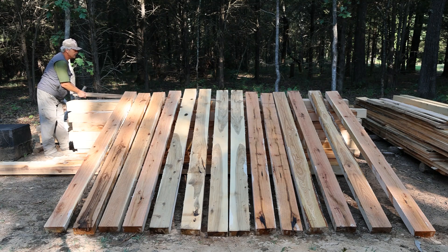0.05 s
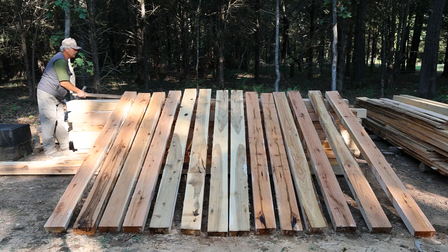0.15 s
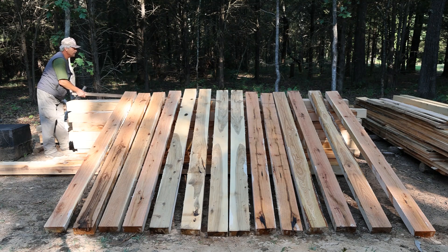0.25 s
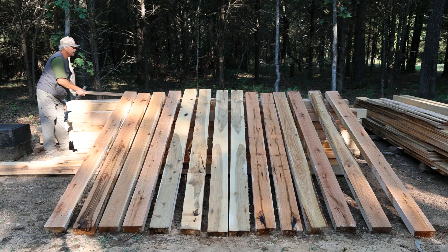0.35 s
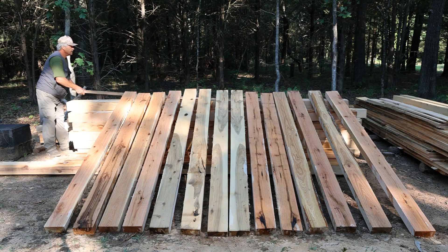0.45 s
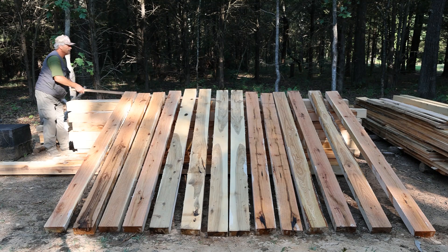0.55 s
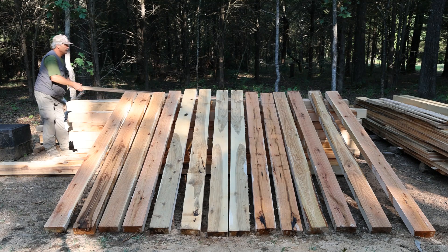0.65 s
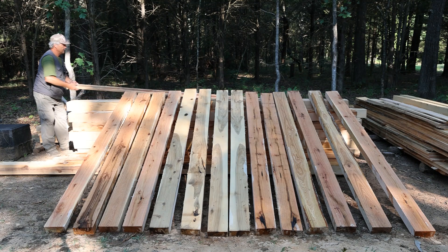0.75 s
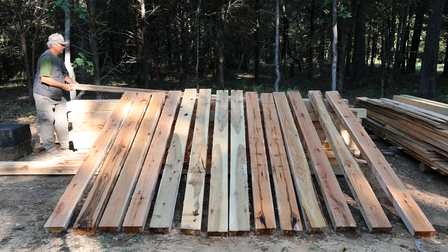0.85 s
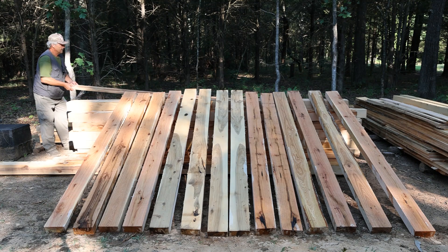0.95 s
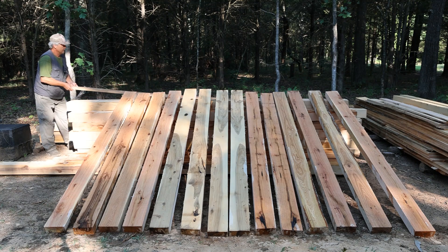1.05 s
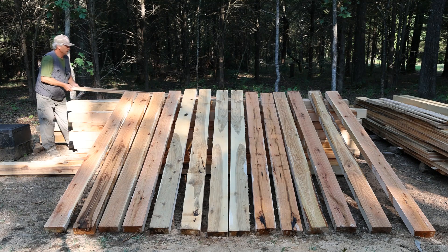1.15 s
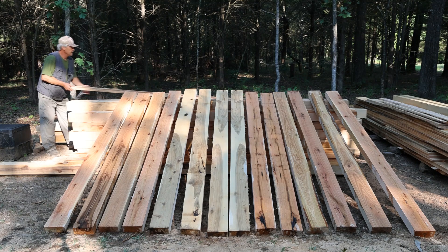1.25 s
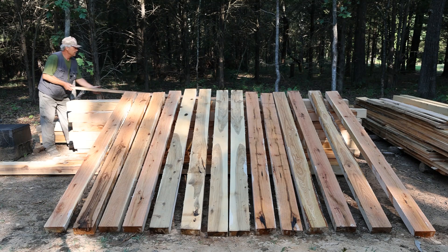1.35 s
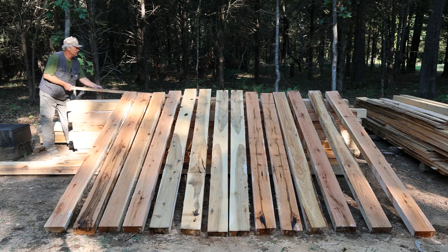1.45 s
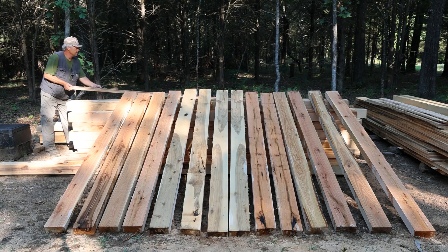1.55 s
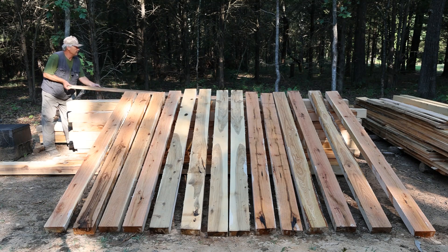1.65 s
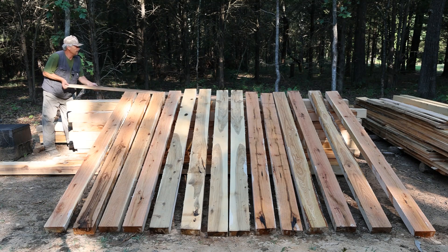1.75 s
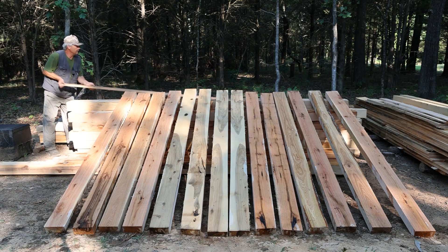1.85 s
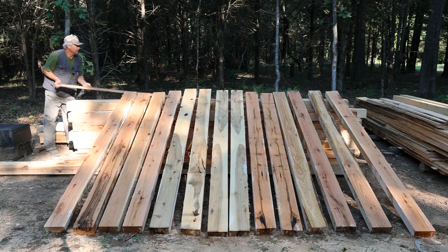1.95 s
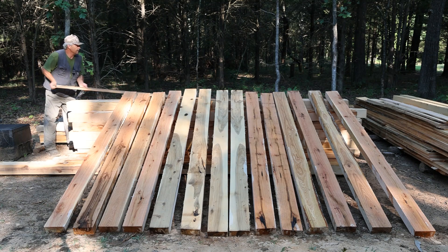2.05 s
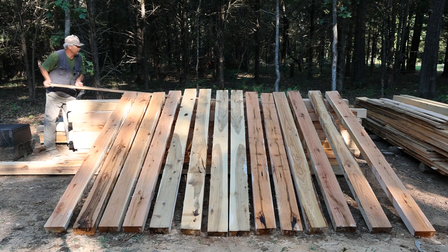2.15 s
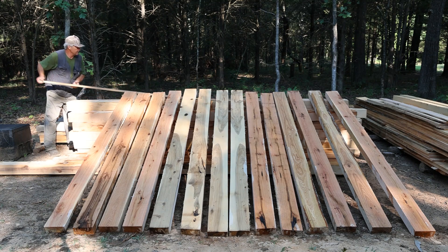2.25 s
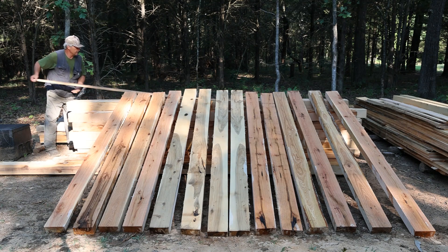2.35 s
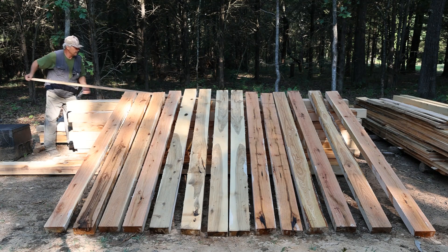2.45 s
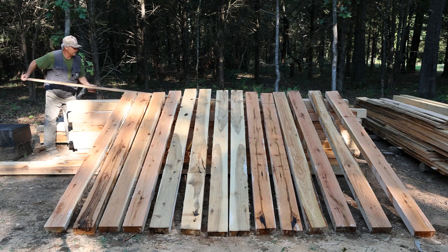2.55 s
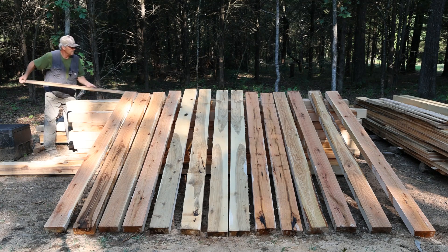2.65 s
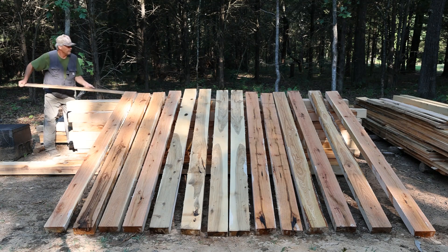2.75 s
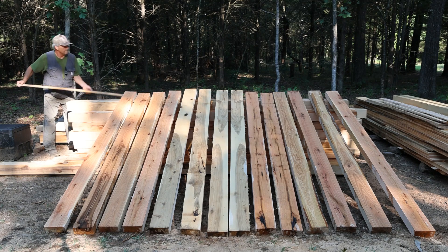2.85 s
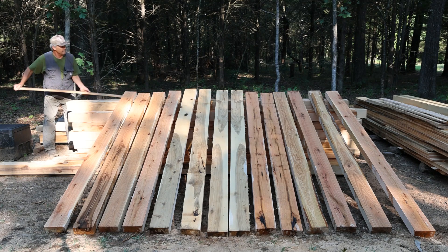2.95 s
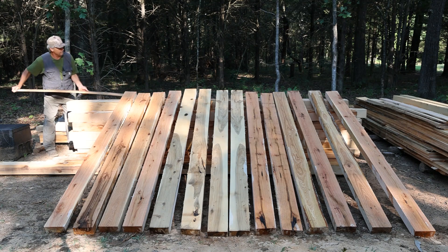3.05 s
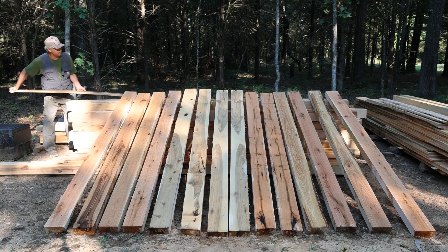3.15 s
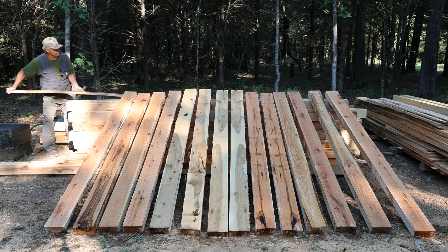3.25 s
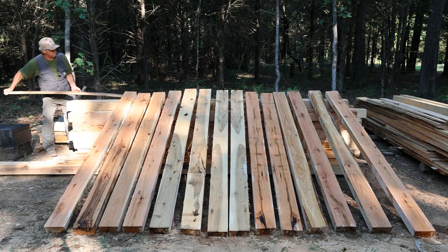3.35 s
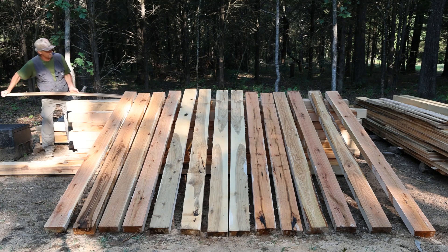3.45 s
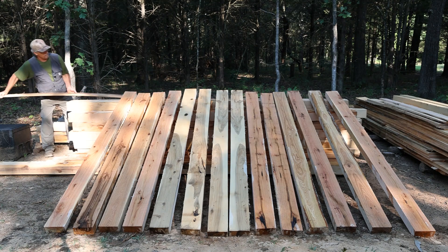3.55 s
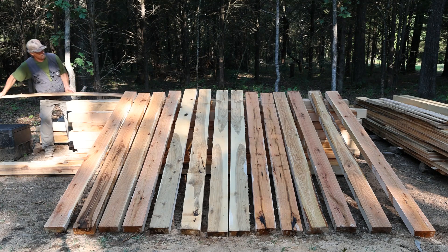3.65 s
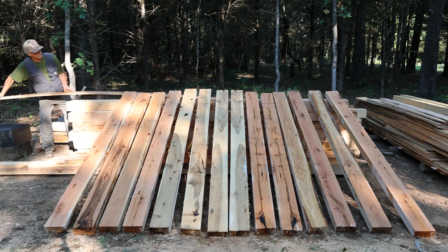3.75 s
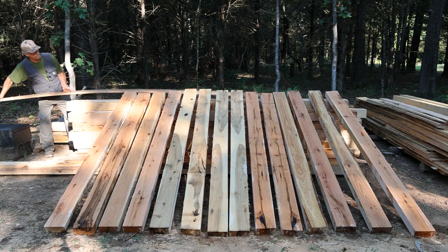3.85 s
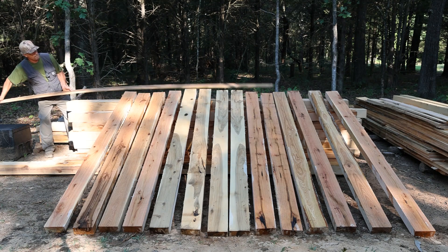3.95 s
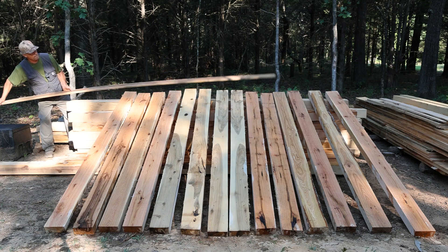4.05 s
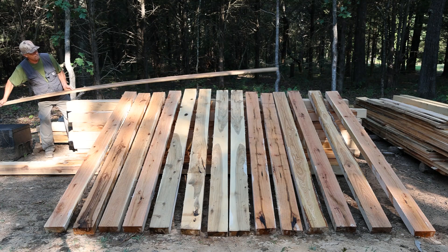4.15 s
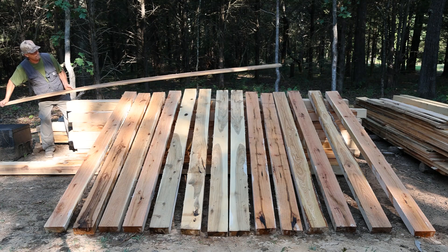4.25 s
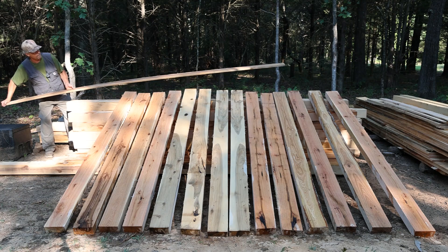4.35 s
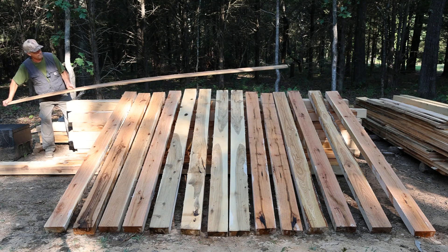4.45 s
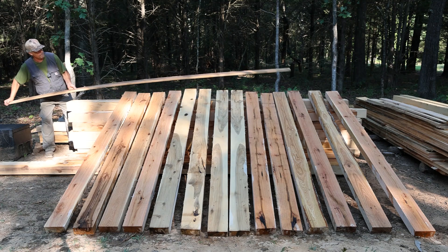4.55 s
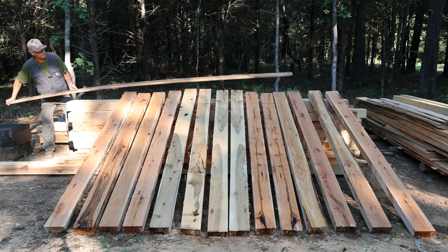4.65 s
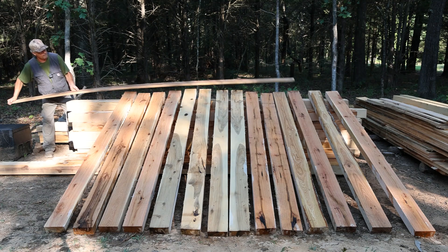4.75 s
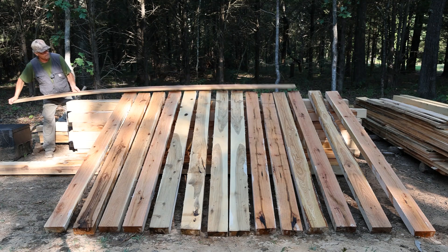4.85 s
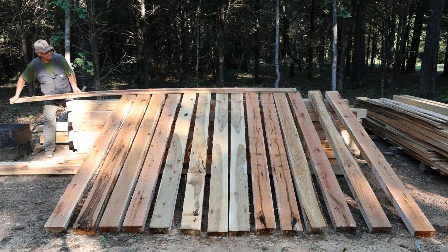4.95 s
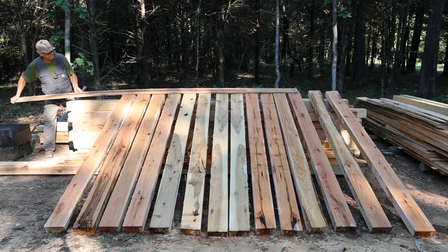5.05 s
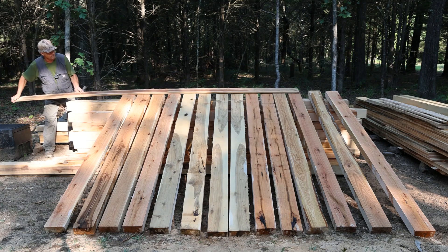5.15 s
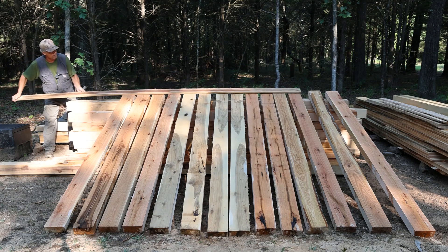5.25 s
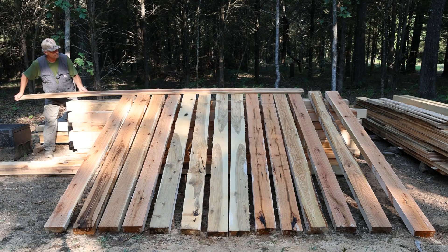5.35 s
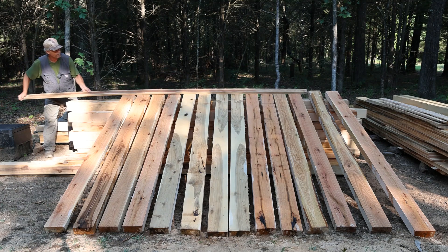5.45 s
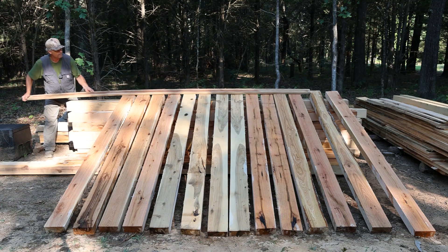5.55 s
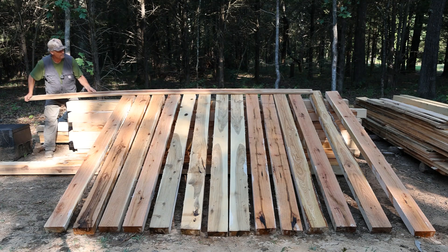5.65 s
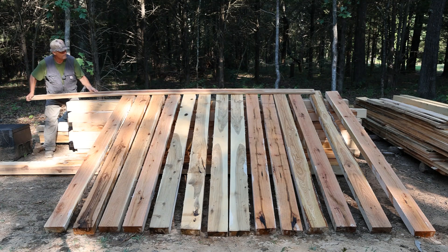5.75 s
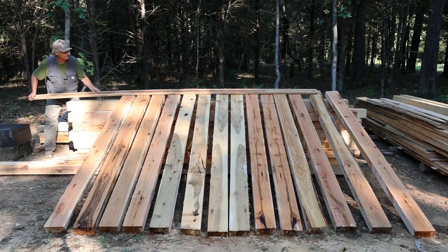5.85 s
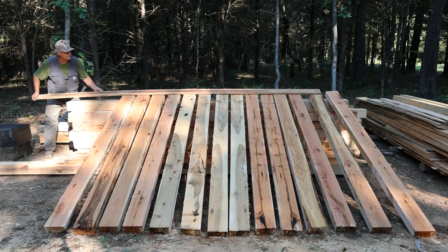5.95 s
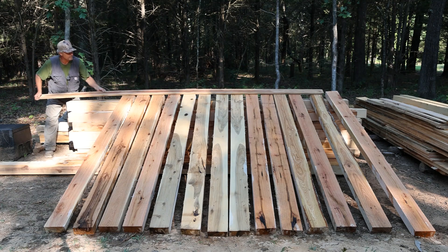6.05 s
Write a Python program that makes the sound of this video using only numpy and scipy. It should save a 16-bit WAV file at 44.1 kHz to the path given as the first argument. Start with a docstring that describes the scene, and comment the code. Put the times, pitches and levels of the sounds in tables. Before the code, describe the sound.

A cicada buzzes in swells over an insect chorus as a wooden plank slides across beams and clacks down three times.

```python
"""A long rough board is drawn back over wooden joists, knocks on them, is dropped flat and pushed along.
Each impact excites a sharp clack, the board's bending modes and a late thud of the joists; in between,
stick-slip friction makes the wood scrape. One near cicada buckles its tymbals in swells over a throbbing
chorus and soft outdoor air. Trees return a faint echo, and a limiter ducks on the loudest knocks."""
import sys
import numpy as np
from scipy import signal
from scipy.fft import rfft, irfft, next_fast_len
from scipy.io import wavfile

SR = 44100
rng = np.random.default_rng(int(sys.argv[2]) if len(sys.argv) > 2 else 0)


def waveform_to_disk(signal):
    """Save audio, clipped to [-1, 1], as 16-bit WAV at the path in sys.argv[1]."""
    frames = np.transpose(np.atleast_2d(signal))
    scaled = np.clip(frames, -1, 1) * 32767
    samples = np.round(scaled).astype(np.int16)
    wavfile.write(sys.argv[1], SR, samples)


N = 269274
TIME = np.arange(N) / SR


# Knocks and bounces. Each row: start in seconds, clack, board ring and joist thud levels in dB,
# contact hardness as a cutoff in Hz, place along the board from 0 to 1.
IMPACTS = [(1.8886, 6, -29, -15.5, 2600, 0.09), (1.9002, -24, -37, -36, 810, 0.04),
           (1.91, -31, -28, -42, 464, 0.31), (2.016, -40, -46, -36.5, 1140, .2),
           (2.45, -33, -49, -43, 2000, .2), (2.773, -30, -56, -34, 1500, .2),
           (2.8356, 8, -15.5, -7, 3930, 0.13), (2.8834, -17, -22.5, -19, 1110, .33),
           (2.8933, -3, -51, -36, 930, .06), (2.9477, -2.5, -26.5, -45, 1024, .27),
           (3.234, -40, -72, -37, 1440, .2), (3.463, -32, -33.5, -51.5, 233, 0),
           (4.998, 3, -18, -34, 1300, 0.05), (5.001, 2.5, -11.5, -15, 1830, .08),
           (5.01, 7, -16, -22, 1170, 0.25), (5.015, 8, -14, -42, 590, 0.1),
           (5.023, -8, -14.5, -26, 1450, .06), (5.139, -31, -29, -24.5, 800, 0.04),
           (5.251, -33, -36, -49, 320, 0), (5.616, -40, -31.5, -36.5, 420, .2)]
# Damped cross-grain resonances. Each row: frequency in Hz, bandwidth in Hz, gain in dB.
CLACK_RESONANCES = [(657, 252, 1.5), (894, 313, 4.5), (1360, 250, -4), (1783, 472, 4.5), (1950, 493, 4),
                    (2600, 220, -9)]
# Modes of the bending board, its short tip and the heavy joists.
# Each row: frequency in Hz, level in dB, 60 dB decay time in seconds.
BOARD_MODES = [(208.2, -10, 0.45), (249, -5.5, 0.21), (288, -20, 0.099), (306, -9, 0.2), (350, -7, 0.13),
               (383.5, -6.5, 0.13), (407, -9, 0.053), (530, -9, 0.087), (565, -12, .16), (614, -3, 0.15),
               (680, -6.5, 0.18), (748.5, -1.5, 0.15), (829, -6, 0.1515), (960, -5.5, 0.077),
               (1042, -17, 0.066), (1059, -4.5, .12), (1148, 6.5, 0.084), (1242, -19.5, .12),
               (1224, -9, 0.15), (1550, -14, 0.073), (1624, -7.5, 0.043), (1765, -4.5, 0.0526),
               (2000, -14, 0.043), (2140, -27, 0.028)]
TIP_MODES = [(962, -3, 0.078), (1180, -9, 0.034), (1793, -14, 0.057), (2000, -16, 0.068)]
JOIST_MODES = [(43.4, -13, 0.43), (60.3, 3, 0.14), (82, -27, 0.21), (107, -27, 0.12), (129.7, -9, 0.11),
               (150, -2, 0.09), (182, -10.5, 0.21), (240, 0, 0.12)]

def knocks(thud_rise_s=0.015, snap_db=-25, overhang_db=21.5, overhang_until_s=1.95):
    """Impact excitation: each contact sets board and joists vibrating freely in their damped modes."""
    t = np.arange(SR // 3) / SR
    out = np.zeros(N + len(t))
    clack = resonate(1.0 * (t == 0), CLACK_RESONANCES)
    clack /= np.abs(clack).max()
    bending = ring(BOARD_MODES, t)
    tip = ring(TIP_MODES, t).sum(axis=0)
    polarity = (-1) ** np.arange(len(JOIST_MODES))
    thud = polarity @ ring(JOIST_MODES, t) * (1 - np.exp(-(t / thud_rise_s) ** 2))
    for (start, clack_db, ring_db, thud_db, hard_hz, place), loose in zip(IMPACTS, rattle(t)):
        # The place of contact decides which bending modes are fed.
        shape = np.cos(np.pi * place * np.arange(len(BOARD_MODES)))
        coupling = np.sign(shape) * np.abs(shape) ** 0.19
        board = from_db(clack_db) * clack + from_db(ring_db) * coupling @ bending
        # The rattle follows the shaking of board and joists; a soft contact passes fewer highs.
        rattle_db = -2 + 0.79 * (ring_db + thud_db) / 2
        board = cut(board + from_db(rattle_db) * loose, hard_hz, order=3)
        # The tip rings far more while it still overhangs.
        tip_db = -28.5 + 0.7 * clack_db + overhang_db * (start < overhang_until_s)
        board += from_db(tip_db) * tip
        # Crushed fibres snap at the first touch.
        snap = from_db(clack_db + snap_db) * rng.standard_normal(len(t)) * np.exp(-t / 0.001)
        at = int(start * SR)
        out[at:at + len(t)] += disperse(board) + cut(snap, 0.94 * hard_hz) + from_db(thud_db) * thud
    return out[:N]


def disperse(x, corner_hz=800, stages=10):
    """Dispersion: bending waves carry highs faster than lows, so a click becomes a falling chirp."""
    a = np.exp(-2 * np.pi * corner_hz / SR)
    return signal.sosfilt([[a, -1, 0, 1, -a, 0]] * stages, x)


# Loose timbers. Each row: octave centre in Hz, level in dB, 60 dB decay time in seconds.
RATTLE_BANDS = [(84.5, -13, 0.4), (186, -10, 0.25), (327, -1.5, 0.15), (706, 0.5, 0.073), (1440, 3, 0.049),
                (2900, -12, 0.054), (5760, -25.5, .03)]

def rattle(t, rise_s=0.0021):
    """Frequency-dependent damping: tiny contacts merge into one burst per knock, whose highs die first."""
    out = 0
    for hz, db, t60 in RATTLE_BANDS:
        octave = signal.butter(2, [hz / np.sqrt(2), hz * np.sqrt(2)], "band", fs=SR, output="sos")
        grains = rms_one(signal.sosfilt(octave, rng.standard_normal((len(IMPACTS), len(t)))))
        out = out + grains * from_db(db) * np.exp(-np.log(1000) * t / t60)
    return out * (1 - np.exp(-t / rise_s))


# The tip is drawn over the joists and chatters into a hollow note; the joists grumble beneath it.
# Each row: start, crest and stop in seconds, level in dB.
TIP_STROKES = [(.1, .79, .81, -53), (1.61, 1.77, 1.86, -41.5), (1.97, 2.1, 2.52, -40),
               (2.36, 2.445, 2.455, -35), (2.86, 2.97, 3.03, -39.5), (3.3, 3.53, 3.57, -53.5)]
CHATTER_STROKES = [(1.64, 1.77, 1.86, -45), (2.25, 2.44, 2.46, -38.5)]
GRUMBLE_STROKES = [(2.02, 2.2, 2.2, -43)]
# The push of the board lying flat. Each row: time in seconds, level in dB.
PUSH_LEVELS = [(5.05, -89), (5.19, -46.5), (5.32, -42.5), (5.63, -38), (5.72, -40), (6.0, -37),
               (6.11, -36.5)]
# The resonances each motion excites. Each row: frequency in Hz, bandwidth in Hz, relative gain in dB.
TIP_RESONANCES = [(178, 140, -4), (320, 53, -3), (388, 19, 0), (745, 390, -5), (1052, 93, 0.5),
                  (1190, 170, -10), (1700, 190, -4.5), (1965, 150, -3), (2420, 1200, -12)]
CHATTER_RESONANCES = [(1009, 13, -4), (855, 91, -20.5)]
GRUMBLE_RESONANCES = [(70, 24, 3), (180.4, 76, 0)]
FLAT_RESONANCES = [(129.7, 24, -3), (303, 47, 2.5), (717, 155, -1), (845, 116, -1), (920, 33, 3),
                   (1120, 91, 1.5), (1600, 190, -7), (2130, 1060, -11)]

def sliding_board():
    """Forced vibration: friction drives different resonances with the tip down and the board flat."""
    draw = scrape(TIP_RESONANCES, catches_per_s=2600, spread_db=1.5, judder_db=1.0)
    draw *= swells(TIP_STROKES, rise_db=14.5, fall_db_per_s=82.5)
    push = scrape(FLAT_RESONANCES, catches_per_s=3300, spread_db=2.0, judder_db=-1.9)
    push *= from_db(np.interp(TIME, *np.transpose(PUSH_LEVELS)))
    chatter = scrape(CHATTER_RESONANCES, catches_per_s=3000, spread_db=1.5, judder_db=1.5)
    chatter *= swells(CHATTER_STROKES, rise_db=22, fall_db_per_s=170)
    grumble = scrape(GRUMBLE_RESONANCES, catches_per_s=910, spread_db=-0.5, judder_db=2.5)
    grumble *= swells(GRUMBLE_STROKES, rise_db=29, fall_db_per_s=17)
    return draw + push + chatter + grumble


def scrape(resonances, catches_per_s, spread_db, judder_db):
    """Stick-slip friction: rough fibres catch and let go, sending uneven clicks into the wood."""
    catches = (rng.random(N) < catches_per_s / SR) * rng.standard_normal(N)
    catches *= from_db(abs(spread_db) * rng.standard_normal(N))
    wood = rms_one(cut(resonate(catches, resonances), 6200))
    return wood * from_db(judder_db * drift(60))


# Swells of the cicada's song. Each row: start, crest and stop in seconds, level in dB.
SONG_SWELLS = [(0.42, .84, 1.06, -36.3), (1.785, 2.17, 2.31, -33.3), (2.93, 3.34, 3.52, -36),
               (4.1, 4.52, 4.715, -34.3), (5.02, 5.45, 5.72, -38)]
# Its body resonances. Each row: frequency in Hz, bandwidth in Hz, relative gain in dB.
CICADA_BODY = [(4000, 720, -11), (5330, 530, -6.5), (6120, 400, 0.5), (7130, 510, -5), (7720, 260, -4.5),
               (8680, 620, -7.5)]
# The broad rasp around the song. Each row: frequency in Hz, relative spectral density in dB.
RASP_SPECTRUM = [(2300, -24), (2750, -10), (3400, -3), (4500, 6), (6000, -12.5), (8000, 7.5), (9500, -2.5),
                 (12000, -6.5), (15700, -20.5)]

def near_cicada(slow_hz=71, fast_hz=77, click_s=0.0025, second_click=0.17, noise_floor=0.82, rasp_db=-13):
    """Pulsed resonance: two tymbals buckle in turn and ring the body, quickening through each swell."""
    effort = sum(np.clip((TIME - start) / (stop - start), 0, 1) * (TIME < stop)
                 for start, _, stop, _ in SONG_SWELLS)
    rate = slow_hz + (fast_hz - slow_hz) * effort + 0.76 * drift(20)
    cycle = np.cumsum(rate) / SR
    first_tymbal = np.exp(-(cycle % 1) / rate / click_s)
    second_tymbal = second_click * np.exp(-((cycle + 0.5) % 1) / rate / click_s)
    drive = first_tymbal + second_tymbal + noise_floor
    song = resonate(rng.standard_normal(N) * drive, CICADA_BODY)
    song = rms_one(cut(cut(song, 8320, order=8), 3000, "high", order=4))
    song *= swells(SONG_SWELLS, rise_db=14.5, fall_db_per_s=169)
    rasp = from_db(rasp_db) * rms_one(noise(RASP_SPECTRUM) * drive)
    return song + rasp * swells(SONG_SWELLS, rise_db=9.5, fall_db_per_s=109)


# Three bands of far insects. Each row: frequency in Hz, relative spectral density in dB.
LOW_BUZZ = [(1900, -37), (2300, -17.5), (2550, -11.5), (2800, -7), (3250, -10.5), (3550, -3.5),
            (3800, -4.5), (4300, -6), (5000, -35), (6500, -48)]
HIGH_BUZZ = [(3500, -20), (4400, -9.5), (5000, -6.5), (5350, -6.5), (5850, -0.5), (6300, -5.5), (6750, -5),
             (7250, -11.5), (8000, -16.5), (9000, -20), (11000, -43)]
INSECT_HISS = [(6000, -10), (8000, 2.5), (9500, -1.5), (10400, -4.5), (12000, -4), (13500, -10.5),
               (15700, -15.5)]

def chorus(low_throb_db=2.0, high_throb_db=-1.5, flicker_db=-0.28):
    """Incoherent summation: far insects blur into bands of buzz, low and high throbbing in antiphase."""
    low_db = fading(db=-48, sag_db_per_s=0.57, start_s=3.79, length_s=1.7, fade_db=10)
    high_db = fading(db=-41.5, sag_db_per_s=0.61, start_s=3.8, length_s=0.9, fade_db=8.5)
    hiss_db = fading(db=-51.5, sag_db_per_s=1.6, start_s=3.6, length_s=0.92, fade_db=10)
    throb = throbbing()
    low = noise(LOW_BUZZ) + shrill_voices(throb)
    low *= from_db(low_db + low_throb_db * throb + flicker_db * drift(150))
    high = noise(HIGH_BUZZ)
    high *= from_db(high_db + high_throb_db * throb + 0.49 * drift(25) + flicker_db * drift(300))
    return low + high + noise(INSECT_HISS) * from_db(hiss_db + 0.7 * drift(400))


# Runs of throbbing. Each row: first crest and end in seconds, first and last rate in throbs per second.
THROBS = [(.061, 3.05, 9.03, 10.65), (3.111, 4.3, 12.86, 15.05)]

def throbbing():
    """Amplitude modulation: a curve of round crests and sharp dips quickens evenly through each run."""
    out = 0
    for first, end, first_rate, last_rate in THROBS:
        t = TIME - first
        beat = first_rate * t + (last_rate - first_rate) * t ** 2 / (2 * (end - first))
        crests = np.pi * np.abs(np.cos(np.pi * beat)) - 2
        out = out + crests * (beat > -0.5) * (TIME < end)
    return out


# Single voices in the chorus. Each row: frequency and bandwidth in Hz, level in dB against the low buzz,
# time of greatest strength and spread about it in seconds.
SHRILL_NOTES = [(2550, 90, -10.5, 0.67, 0.81), (3174, 87, -1.5, 2.6, 2.4), (3354, 67, 3.5, 3.1, 0.36),
                (3390, 66, 3.5, 0.38, 0.081), (3400, 35, -3.5, 3.1, 1.8), (3880, 130, 2, 0.57, 0.78),
                (4945, 90, -0.5, 0.82, 9.6), (5700, 93, 1.5, 1.6, 4.0), (6000, 55, -1.5, 1.8, 2.2),
                (6310, 130, 7, 2.1, 1.9), (7300, 160, 2, 2.2, 2.62), (9400, 80, -12, .3, 1.05)]

def shrill_voices(throb, wander_db=3.6, offbeat_above_hz=4400, offbeat_db=1.0):
    """Random modulation widens each note to a narrow rasp; the higher ones lean against the throb."""
    out = 0
    for hz, width, db, strongest, spread in SHRILL_NOTES:
        rasp = drift(2 * width) * np.cos(2 * np.pi * hz * TIME + drift(width))
        presence = np.exp(-0.5 * ((TIME - strongest) / spread) ** 2)
        dip_db = offbeat_db * np.maximum(throb, -1) * (hz > offbeat_above_hz)
        out = out + rasp * presence * from_db(db + wander_db * drift(9.9) - dip_db)
    return out


def forest_echo(x, t60=0.7, build_s=0.075):
    """Scattering: many trunks return a dull echo that builds up, then decays exponentially."""
    t = np.arange(SR) / SR
    envelope = np.exp(-np.log(1000) * t / t60) * (1 - np.exp(-t / build_s))
    echo = cut(rng.standard_normal(SR), 2600) * envelope
    return signal.fftconvolve(x, echo / np.sqrt(np.sum(echo ** 2)))[:N]


# Outdoor air and a faint low noise. Each row: frequency in Hz, relative spectral density in dB.
AIR_SPECTRUM = [(20, -6), (45, 1), (80, -0.5), (160, -7), (350, -11.5), (800, -15), (1600, -18),
                (3000, -18.5), (15000, -25)]
STEREO_NOISE_SPECTRUM = [(20, 14), (200, 10.5), (1000, 4), (3000, -10), (15000, -7)]

def background(air_db=-53.5, stereo_noise_db=-67.5):
    """Noise floor: air common to both channels, and a faint low noise, different in left and right."""
    air = noise(AIR_SPECTRUM) * from_db(air_db + 0.47 * drift(1.4))
    stereo_noise = np.stack([noise(STEREO_NOISE_SPECTRUM), noise(STEREO_NOISE_SPECTRUM)])
    return air + from_db(stereo_noise_db) * stereo_noise


def ring(modes, t):
    """Free vibration: exponentially damped sinusoids, one row per mode."""
    hz, db, t60 = np.transpose(modes)
    decay = np.exp(-np.log(1000) * np.outer(1 / t60, t))
    return from_db(db)[:, None] * np.sin(2 * np.pi * np.outer(hz, t)) * decay


def resonate(x, resonances):
    """Resonance: two-pole filters in parallel, summed with alternating sign."""
    out = 0
    for k, (hz, width, db) in enumerate(resonances):
        r = np.exp(-np.pi * width / SR)
        poles = [1, -2 * r * np.cos(2 * np.pi * hz / SR), r * r]
        gain = (-1) ** k * from_db(db) * (1 - r * r) / 2
        out = out + gain * signal.lfilter([1, 0, -1], poles, x + 1e-18)
    return out


def swells(rows, rise_db, fall_db_per_s):
    """Power addition: the joint gain of gestures that climb to a crest, hold, and die after the stop."""
    power = 0
    for start, crest, stop, db in rows:
        climb = np.minimum((TIME - start) / (crest - start), 1)
        fall_db = fall_db_per_s * np.maximum(TIME - stop, 0)
        power = power + from_db(db - rise_db * (1 - climb) - fall_db) ** 2
    return np.sqrt(power)


def fading(db, sag_db_per_s, start_s, length_s, fade_db):
    """Exponential decay: a level in dB that sags steadily and fades further from start_s."""
    return db - sag_db_per_s * TIME - fade_db * np.clip((TIME - start_s) / length_s, 0, 1)


def noise(spectrum):
    """Spectral shaping: white noise takes on a given colour, at rms 1."""
    hz, db = np.transpose(spectrum)
    length = next_fast_len(N)
    log_f = np.log(np.fft.rfftfreq(length, 1 / SR) + 1)
    gain = from_db(np.interp(log_f, np.log(hz), db, left=-90, right=-90))
    return rms_one(irfft(rfft(rng.standard_normal(length)) * gain, length)[:N])


def drift(per_s):
    """Random fluctuation: straight lines join Gaussian values of spread 1."""
    knots = rng.standard_normal(4000)
    return np.interp(TIME * per_s, np.arange(len(knots)), knots)


def cut(x, hz, kind="low", order=2):
    """Maximally flat low- or high-pass filtering."""
    return signal.sosfilt(signal.butter(order, min(hz, SR / 2 - 1), kind, fs=SR, output="sos"), x)


def from_db(db):
    """Decibels to amplitude ratio."""
    return 10 ** (np.asarray(db) / 20)


def rms_one(x):
    """Normalisation to rms 1."""
    return x / np.sqrt(np.mean(x ** 2) + 1e-20)


def scene(echo_db=-38.5):
    """Superposition: wood, echo and insects, all heard from straight ahead, add to the background."""
    wood = knocks() + sliding_board()
    return wood + from_db(echo_db) * forest_echo(wood) + near_cicada() + chorus() + background()


def record(dry, limit_db=-1.0, release_db_per_s=90, lookahead_s=0.001, cutoff_hz=15750):
    """Peak limiting: the gain ducks just ahead of a peak and recovers; a steep low-pass cuts the top."""
    peak_db = 20 * np.log10(np.abs(dry).max(axis=0) + 1e-9)
    over_db = np.maximum(peak_db - limit_db, 0)
    held_db = np.maximum.accumulate(over_db + release_db_per_s * TIME) - release_db_per_s * TIME
    duck_db = np.interp(TIME + lookahead_s, TIME, cut(held_db, 200, order=1))
    limited = np.clip(dry * from_db(-duck_db), -1, 1)
    return signal.sosfilt(signal.ellip(10, 0.1, 80, cutoff_hz, fs=SR, output="sos"), limited)


dry = scene()
out = record(dry)
waveform_to_disk(out)
```